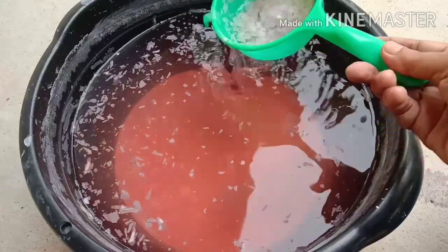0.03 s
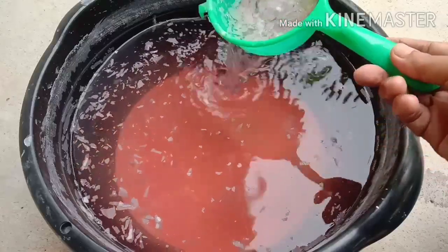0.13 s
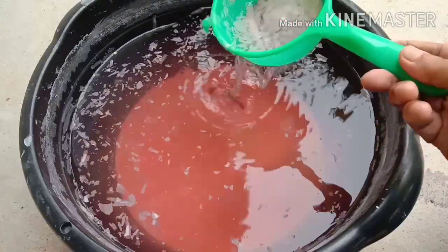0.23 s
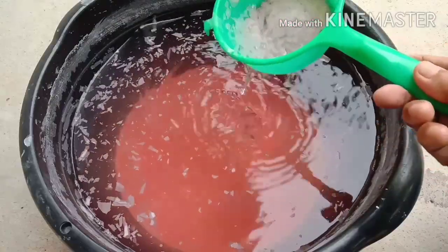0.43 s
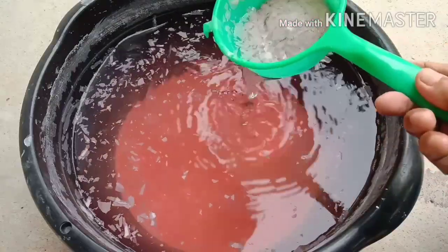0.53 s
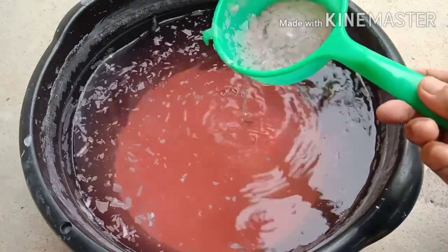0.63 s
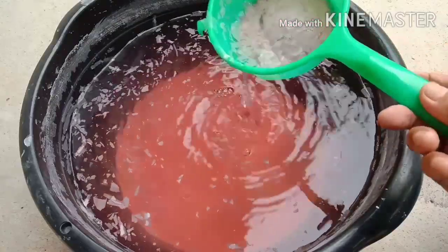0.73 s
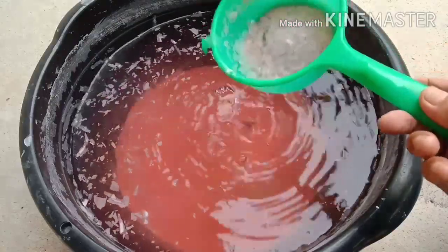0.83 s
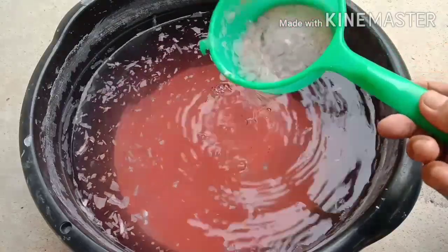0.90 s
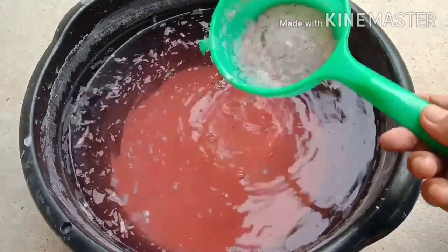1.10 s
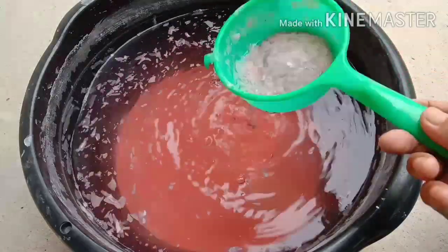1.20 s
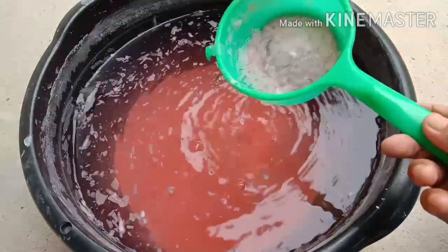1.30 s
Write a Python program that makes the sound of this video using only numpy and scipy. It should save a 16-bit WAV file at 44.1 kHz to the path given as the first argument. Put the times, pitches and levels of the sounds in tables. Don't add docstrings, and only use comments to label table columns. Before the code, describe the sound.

Close-miked water drops fall into a wide tub outdoors, starting lightly, bunching into a quick splashy patter with ringing bubbles, then thinning after one sharp plop, over faint motor hum and insect buzz.

```python
import sys
import numpy as np
from scipy import signal
from scipy.fft import rfft, irfft
from scipy.io import wavfile

SR = 44100
rng = np.random.default_rng(int(sys.argv[2]) if len(sys.argv) > 2 else 0)


def invert_db(x):
    u = np.asarray(x, float) / 20
    return 10 ** u


def store_wav(level_fs):
    pcm = np.round(np.clip(np.atleast_2d(level_fs), -1, 1) * 32767)
    wavfile.write(sys.argv[1], SR, pcm.T.astype(np.int16))


N = 59535


def rms_one(x):
    return x / np.sqrt(np.mean(x ** 2) + 1e-20)


def coloured(points):
    hz, db = np.transpose(points)
    f = np.arange(N // 2 + 1) * SR / N + 1
    shape = np.interp(np.log(f), np.log(hz), db)
    shape -= 30 * np.maximum(np.log2(hz[0] / f), 0)
    shape -= 90 * np.maximum(np.log2(f / hz[-1]), 0)
    return rms_one(irfft(rfft(rng.standard_normal(N)) * invert_db(shape), N))


def buzz(hz, width_hz):
    r = np.exp(-np.pi * width_hz / SR)
    a = [1, -2 * r * np.cos(2 * np.pi * hz / SR), r * r]
    once = signal.lfilter([1, 0, -1], a, rng.standard_normal(N + SR))
    return rms_one(signal.lfilter([1], a, once)[SR:])


# (time [s], level [dB])
GUST_SWELL = [(0, -11.5), (.15, 8), (.25, -5), (.35, 4.5), (.45, 11.5), (.57, 6), (.66, 11.5), (.78, -9.5),
              (.92, 13), (1.02, -1.5), (1.35, -2.5)]


def gust_db():
    return np.interp(np.arange(N) / SR, *np.transpose(GUST_SWELL))


# (pitch [Hz], level [dB])
RUMBLE_COLOUR = [(15, -73), (25, -43), (54, -3.5), (151, -2), (379, -14.5), (487, -17.5), (700, -29),
                 (910, -68), (1540, -120)]
# (pitch [Hz], level per Hz [dB])
AIR_COLOUR = [(600, 6), (1000, -1), (1250, 11.5), (1600, -7), (4000, -9.5), (8000, -16), (10000, -9),
              (16000, -7.5)]


def rumble_and_air():
    rumble = invert_db(-56.5 + 0.12 * gust_db()) * coloured(RUMBLE_COLOUR)
    return rumble + invert_db(-63) * coloured(AIR_COLOUR)


# (pitch [Hz], width [Hz], level [dB])
MOTOR_HUM = [(119, 21.3, -63), (151.74, 6.6, -64), (244.8, 6.8, -80), (407.4, 9.1, -81)]


def motor():
    out = np.zeros(N)
    for hz, width_hz, db in MOTOR_HUM:
        out += invert_db(db + gust_db()) * buzz(hz, width_hz)
    return out


# (start [s], end [s], pitch [Hz], width [Hz], level [dB])
INSECT_SWELLS = [
    (-.1, 0.22, 6800, 810.2, -59.5),
    (-.1, 0.12, 4770, 500, -62),
    (0.286, 0.835, 4480, 700, -52.5),
    (0.064, 1.17, 6900, 1393, -63.5),
    (0.864, 1.212, 4970, 630, -58.5),
    (1.192, 1.463, 6920, 766.8, -55),
]
# (start [s], end [s], pitch [Hz], width [Hz], level [dB])
FAR_WHINES = [
    (-.1, .11, 495, 10, -71),
    (.49, .63, 400, 8, -69),
]


def insects():
    out, t, fade_s = np.zeros(N), np.arange(N) / SR, 0.018
    for start, end, hz, width_hz, db in INSECT_SWELLS + FAR_WHINES:
        fade_in = 1 + np.exp((start - t) / fade_s)
        fade_out = 1 + np.exp((t - end) / fade_s)
        out += invert_db(db) * buzz(hz, width_hz) / fade_in / fade_out
    return out


def add(out, s, x):
    i = int(s * SR)
    out[i:i + len(x)] += x[:max(N - i, 0)]


def wobbles(count, length):
    raw = rng.standard_normal((count, length, 2)) @ [1, 1j]
    slow = signal.sosfilt(signal.butter(2, 500, fs=SR, output="sos"), raw)
    return slow / np.abs(slow).std() / 2


def bubble(db, hz, t60, rise, wobble, life_s=1):
    t = np.arange(len(wobble)) / SR
    rise = max(rise, 1e-4) * 100
    burst_s = min(.5 / rise, life_s)
    swell = 1 - np.exp(-t / .00035)
    decay = invert_db(db - 60 * t / t60)
    burst = np.clip((burst_s - t) / .003, 0, 1)
    ring = np.exp(2j * np.pi * hz * (t + .5 * rise * t * t))
    return swell * decay * burst * np.imag((1 + wobble) * ring)


# (time [s], level [dB])
SPRAY_LEVEL = [(0, -18.5), (.19, -13), (.22, -6.5), (.3, 11), (.5, -27), (.66, -12), (.75, -23), (.9, -22),
               (1.0, -17)]


def spray():
    out, still = np.zeros(N), np.zeros(600)
    count = int(1600 * N / SR)
    for s, pitch, size in rng.random((count, 3)) * [N / SR, 1, 1]:
        hz = 1200 * 8.0 ** pitch
        db = -42 + np.interp(s, *np.transpose(SPRAY_LEVEL)) - 2.2 * np.log(size + 0.031)
        add(out, s, bubble(db, hz, 5.75 / hz, 0.069, still))
    return out


SMALL_RISE, SMALL_ROUGH = 0.042, 0.7

# (time [s], peak level [dB], pitch [Hz], time to fall 60 dB [s])
SMALL_BUBBLES = [(0.092, -41, 6350, 0.013), (0.097, -30.5, 6890, 0.015), (.1478, -39, 7400, 0.016),
                 (0.2013, -34.5, 5800, 0.019), (0.2137, -45, 7100, 0.011), (0.798, -35.5, 7600, 0.016),
                 (.256, -28, 5370, 0.0099), (.261, -27, 7000, 0.0085), (.289, -19, 5270, 0.013),
                 (0.287, -45, 5550, 0.067), (0.335, -36.5, 6050, 0.027), (0.3606, -31.5, 2750, 0.016),
                 (0.3702, 0, 6170, 0.0013), (0.4104, -30, 7040, 0.01), (0.423, -33.5, 3650, 0.019),
                 (.453, -25.5, 4700, 0.0082), (0.4559, -18.5, 7270, 0.008), (0.459, -26, 6230, 0.021),
                 (0.5023, -24.5, 7580, 0.0056), (.621, -37, 7640, 0.015), (0.6323, -26, 3570, 0.02),
                 (0.6947, -5, 9250, 0.0025), (.798, -54, 5400, 0.017), (0.851, -39, 4900, 0.019),
                 (0.8625, -39, 3930, 0.025), (0.9861, -39.5, 4480, 0.022), (1.029, -37.5, 5360, 0.027),
                 (1.203, -21.5, 8220, 0.0094), (1.327, -43.5, 5500, 0.014)]


def small_bubbles():
    out = np.zeros(N)
    for (s, db, hz, t60), wobble in zip(SMALL_BUBBLES, wobbles(len(SMALL_BUBBLES), 3000)):
        add(out, s, bubble(db, hz, t60, SMALL_RISE, SMALL_ROUGH * wobble))
    return out


# (time [s], peak level [dB], lowest pitch [Hz],
# highest pitch [Hz])
SURFACE_HITS = [(0.0951, -30.5, 7160, 12000), (.153, -51, 9000, 14000), (0.2037, -27.5, 7060, 12000),
                (0.2119, -24, 2160, 8900), (0.2195, -33, 9100, 11900), (0.232, -36, 2500, 8000),
                (0.2599, -20.5, 1370, 6500), (0.278, -25.5, 2400, 12000), (.289, -23.5, 4860, 15000),
                (0.313, -33.5, 2470, 7950), (0.336, -38, 1380, 9000), (.369, -18, 1650, 8140),
                (0.4084, -25, 1340, 5700), (0.4513, -33, 9900, 13000), (0.468, -36, 1190, 4020),
                (.501, -22.5, 3360, 8400), (.586, -27, 5000, 15200), (0.5948, -23, 1870, 9400),
                (0.6343, -34, 3650, 5940), (.642, -36, 5100, 8500), (0.647, -29, 1900, 7700),
                (0.6941, -15.5, 7020, 14800), (0.6999, -26, 7000, 12000), (.798, -25.5, 4400, 10300),
                (0.8079, -31, 2000, 9300), (0.8642, -15, 1950, 8600), (0.8868, -28, 5100, 12200),
                (1.012, -26, 10600, 13500), (1.1095, -28, 7700, 10200), (1.2016, -24, 6600, 10100),
                (.446, -33.5, 7400, 11000),
    (.6955, -32, 3340, 4900),
    (.955, -64, 6840, 10190),
    (1.004, -43, 6540, 9000),
    (1.027, -50, 8000, 15000),
    (0.92, -50, 7300, 14000),
    (1.094, -43, 3400, 11110),
    (1.2571, -33, 3280, 14000),
    (1.2736, -32.5, 3300, 8900),
    (1.347, -42, 2350, 15000),
]


def impacts():
    out, t = np.zeros(N), np.arange(1000) / SR
    for s, db, low_hz, top_hz in SURFACE_HITS:
        splat = rng.standard_normal(len(t)) * invert_db(-60 * t / 0.019)
        splat = splat + invert_db(7) * (t < 2 / SR)
        for lag in (rng.uniform(.0003, .001, size=2) * SR).astype(int):
            splat = splat - .4 * np.pad(splat, (lag, 0))[:len(t)]
        splat = signal.sosfilt(signal.butter(6, low_hz, "high", fs=SR, output="sos"), splat)
        splat = signal.sosfilt(signal.butter(2, min(top_hz, .45 * SR), fs=SR, output="sos"), splat)
        add(out, s, invert_db(db) * splat / np.abs(splat).max())
    return out


# (time [s], peak level [dB], pitch [Hz])
SPLASH_SPECKS = [(0.186, -50, 6900), (0.269, -43, 5300), (.2795, -45, 7900), (0.3025, -35.5, 2420),
                 (.329, -48, 3860), (0.359, -40, 4520), (0.373, -34, 7400), (.393, -39, 4830),
                 (0.401, -43, 9000), (0.431, -40, 11100), (0.456, -30, 15200), (0.488, -43, 5700),
                 (.489, -39, 15100), (0.546, -41, 4580), (0.582, -43, 4100), (0.61, -38, 5950),
                 (.613, -48, 3400), (0.635, -54, 10700), (.637, -39, 11500), (0.646, -46, 11600),
                 (.686, -37, 10000), (0.735, -40, 4400), (0.797, -37.5, 2290), (0.81, -47.5, 2200),
                 (.955, -50, 8500), (1.005, -46, 7300), (1.057, -45, 6300), (1.125, -57, 8800),
                 (1.2031, -36.5, 5400), (1.218, -42, 9000), (1.257, -40, 7640)]


def specks():
    out = np.zeros(N)
    for (s, db, hz), wobble in zip(SPLASH_SPECKS, wobbles(len(SPLASH_SPECKS), 1500)):
        add(out, s, bubble(db, hz, 88 / hz, SMALL_RISE, SMALL_ROUGH * wobble))
    return out


# (time [s], peak level [dB], pitch [Hz], time to fall 60 dB [s],
# pitch rise [share per 10 ms])
LARGE_BUBBLES = [(0.2121, -23, 2465, 0.013, 0.024), (0.259, -24, 1232, 0.16, 0.18),
                 (0.277, -30.5, 943, 0.046, 0.056), (.289, -28, 1300, 0.031, 0.055),
                 (0.3128, -32, 1482, 0.034, 0.011), (0.337, -28, 888, 0.046, 0.01),
                 (0.3695, -29, 917, 0.08, 0.01), (0.408, -24.5, 884, 0.082, 0.004),
                 (0.4662, -27, 838, 0.055, 0.0024), (0.5929, -32, 1654, 0.05, 0.03),
                 (0.5962, -30, 2726, 0.03, 0.04), (0.6464, -26, 1283, 0.1, 0.00066),
                 (0.797, -34.5, 1700, 0.044, 0.0089), (0.2099, -52.5, 968, 0.23, 0.0074),
                 (0.2133, -35, 3940, 0.021, 0.016), (0.864, -9.5, 2150, 0.0056, 0.022),
                 (.888, -23.5, 2860, 0.0088, 0.022), (1.2077, -39, 3315, 0.018, 0.028),
                 (1.2554, -36.5, 2526, 0.044, 0.054), (1.2733, -33, 2103, 0.036, 0.004)]
# the same columns, then (life [s])
EARLY_BURSTS = [
    (.4565, -27.5, 3340, 0.035, 0.08, 0.011),
    (0.475, -38, 1044, .2, 0.32, 0.012),
    (0.485, -39.5, 1267, 0.26, 0.00087, 0.04),
    (.5013, -18.5, 2079, 0.04, 0.11, 0.0092),
    (0.799, -34.5, 1243, 0.18, .001, 0.014),
    (0.808, -37.5, 1148, 0.1, 0.072, 0.046),
    (0.8895, -32, 1400, 0.039, .001, 0.0027),
    (0.899, -64, 1042, 0.068, .001, 0.034),
]
# the same columns, then (life [s])
HEAVIEST_DROP = [
    (.8638, -11, 1130, .05, .15, .005),
    (.867, -23.5, 1000, .06, .08, .0075),
    (.8725, -26, 1160, .2, .16, .015),
]


def large_bubbles():
    out, rows = np.zeros(N), LARGE_BUBBLES + EARLY_BURSTS + HEAVIEST_DROP
    for (s, db, hz, t60, rise, *life_s), wobble in zip(rows, wobbles(len(rows), 6600)):
        add(out, s, bubble(db, hz, t60, rise, .08 * wobble, *life_s))
    return out


def drops():
    out = small_bubbles() + impacts() + specks() + large_bubbles()
    return signal.sosfilt(signal.butter(7, 800, "high", fs=SR, output="sos"), out)


def basin(x):
    t = np.arange(int(.4 * SR)) / SR
    noise, late = rng.standard_normal((2, len(t)))
    echoes = noise * (rng.random(len(t)) < .03) * invert_db(-60 * t / .03)
    dull = signal.sosfilt(signal.butter(1, 9700, fs=SR, output="sos"), late)
    tail = dull * invert_db(-60 * t / 0.19) * np.minimum(t / 0.0096, 1)
    ring = np.sin(2 * np.pi * 1250 * t) * invert_db(-42 - 60 * t / .12)
    response = invert_db(-15) * echoes / np.linalg.norm(echoes)
    response += invert_db(-19) * tail / np.linalg.norm(tail) + .15 * ring
    return x + signal.fftconvolve(x, response)[:N]


def faint_side(mid):
    smear = rng.standard_normal(300) * np.hanning(300)
    side = invert_db(-32.5) * signal.fftconvolve(mid, smear / np.linalg.norm(smear))[100:N + 100]
    hiss = coloured([(25, -46), (300, -46), (700, -26), (8000, -39), (15000, -32.5)])
    return side + invert_db(-74) * hiss + invert_db(-82) * coloured(RUMBLE_COLOUR)


def scene():
    outdoors = rumble_and_air() + motor() + insects()
    mid = outdoors + basin(spray() + drops())
    side = faint_side(mid)
    return np.array([mid + side, mid - side])


def top_cut(x):
    return signal.sosfilt(signal.butter(12, 16810, fs=SR, output="sos"), x)


# (pitch [Hz], level [dB])
MIC_COLOUR = [(7800, -1.5), (9500, -7), (13800, -19.5), (15050, 0.5), (15500, -10), (15800, -43)]


def record(dry):
    hz, db = np.transpose(MIC_COLOUR)
    taps = signal.firwin2(255, [0, *hz, SR / 2], invert_db(np.array([0, *db, -90])), fs=SR)
    mix = signal.fftconvolve(dry, taps[None], "same")
    return top_cut(mix)


dry = scene()
out = record(dry)
store_wav(out)
```